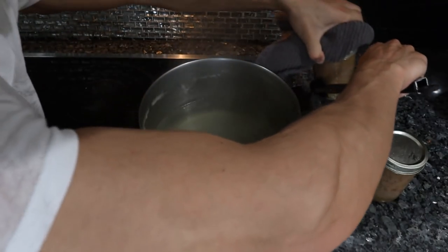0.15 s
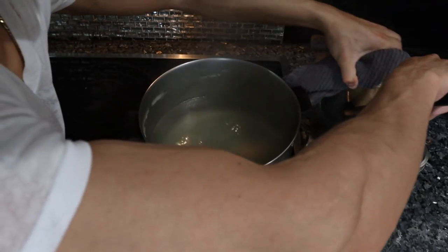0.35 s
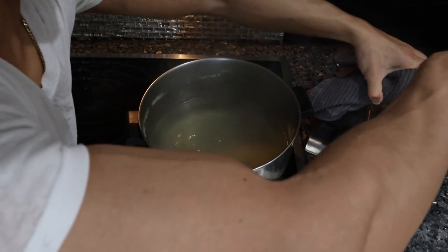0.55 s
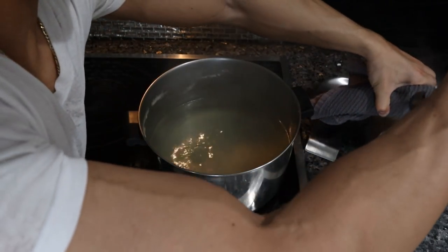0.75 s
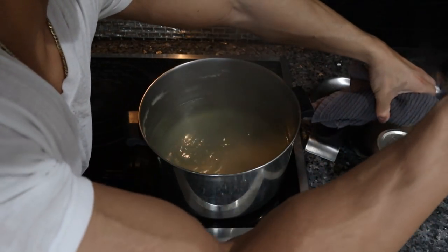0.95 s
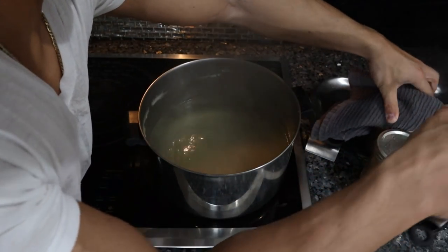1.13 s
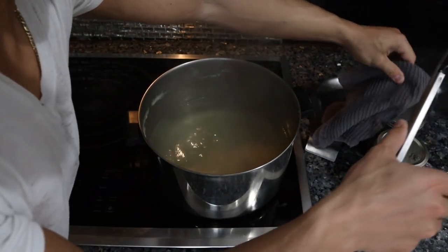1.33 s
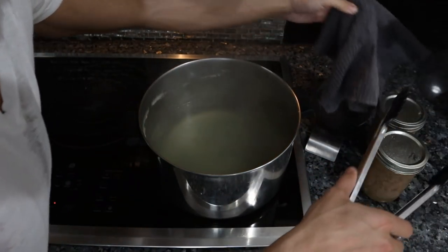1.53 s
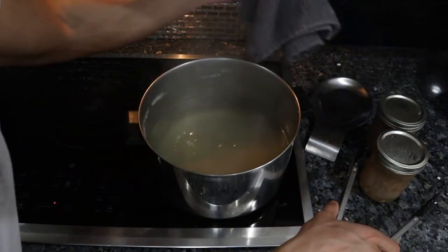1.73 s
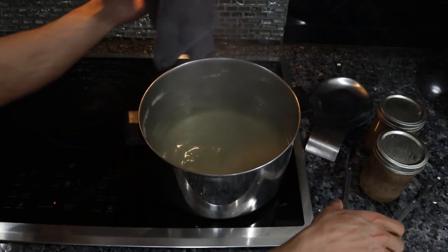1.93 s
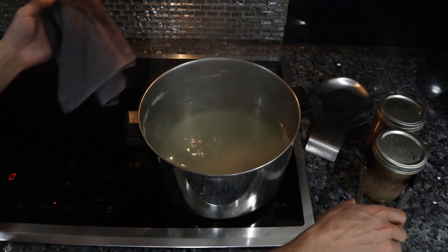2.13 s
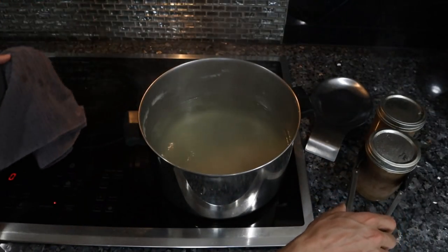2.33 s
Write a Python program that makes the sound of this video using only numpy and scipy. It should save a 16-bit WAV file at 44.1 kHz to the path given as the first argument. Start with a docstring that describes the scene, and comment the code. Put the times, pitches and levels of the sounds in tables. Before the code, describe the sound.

A full glass jar is set on a stone counter, heard close in mono in a small, reflective kitchen. A pot simmers faintly; thin metallic ticks come at 0 and 0.13 s. The jar grazes a spoon rest at 0.65, lands loudly at 1.0 and rocks flat at 1.18. Towel hiss and flapping follow until about 2.2, with faint squeaks near 1.6. Tongs clatter around 2.15-2.2, then scrape softly to a low bump.

```python
"""A small hard kitchen, heard in mono from near a stone counter, over a quietly simmering pot (coloured noise).
A full, hot glass jar comes down in jar tongs: it grazes a spoon rest, lands on its heel and rocks flat.
A towel is drawn away as fluttering hiss and flap; the tongs' hinge ticks and squeaks, and they drag and clatter down.
Each blow is a filtered click with a noise clatter and damped sines; a diffuse tail answers it from the room.
"""
import sys
import numpy as np
from scipy import signal
from scipy.fft import rfft, irfft, next_fast_len
from scipy.io import wavfile
from scipy.ndimage import uniform_filter1d

SR = 44100
rng = np.random.default_rng(int(sys.argv[2]) if len(sys.argv) > 2 else 0)


def wav_record(signal):
    """Record a signal, one row per channel, as 16-bit PCM in the file named by sys.argv[1]."""
    frames = np.transpose(np.atleast_2d(signal))
    bounded = np.clip(frames, -1, 1)
    # unit amplitude maps onto the largest positive 16-bit level
    quanta = np.round(bounded * 32767).astype(np.int16)
    wavfile.write(sys.argv[1], SR, quanta)


N = 104693  # length [samples]

# Simmering pot, colour: (frequency [Hz], level [dB])
SIMMER_COLOUR = [(50, -10.5), (80, -8), (120, 0.5), (165, -6.5), (270, 1.5), (420, -7.5), (580, -6),
                 (950, -13), (1900, -14.5), (2600, -14.5), (4000, -19), (5600, -22), (6900, -22.5),
                 (7900, -34), (10000, -35), (15500, -38.5)]
SIMMER_DB = -56

# Wire hinge of the tongs ticking under load: (time [s], level [dB], ring [dB])
TICKS = [(.0095, -24.5, 6.5), (.1275, -25, 8.5)]
# Colour of a tick: (frequency [Hz], level [dB])
TICK_COLOUR = [(500, -40), (4000, -18), (6400, -0.5), (8000, -11), (10000, -26), (12000, -11), (15500, -20)]
# Ringing of the hinge: (frequency [Hz], energy [dB], t60 [s])
TICK_MODES = [(5220, -10, 0.21), (6470, 11, 0.035), (6670, -6, 0.38), (6640, -19, 0.27), (11650, -18, 0.32),
              (11790, -18, .25), (15200, -14, .08)]

# Faint squeaks of the hinge: (time [s], length [s], frequency [Hz], level [dB])
SQUEAKS = [(.5, .14, 6950, -70), (.8, 0.1, 4530, -61), (1.595, 0.2, 2150, -60), (1.6, 0.2, 4300, -61),
           (1.753, .2, 2510, -63)]
SQUEAK_WIDTH_HZ = 110

# Jar grazing the spoon rest: (time [s], level [dB], ring [dB])
GRAZES = [(.6527, -3, -13.5), (.6692, -6.5, 0.5)]
# Colour of the graze: (frequency [Hz], level [dB])
GRAZE_COLOUR = [(100, -10), (400, -9.5), (600, 2), (1100, 0.5), (1400, -4.5), (2300, 2), (2800, -10.5),
                (3300, -8), (4300, -22), (5500, -15), (7000, -25.5), (15000, -42)]
# Ringing of the graze: (frequency [Hz], energy [dB], t60 [s])
GRAZE_MODES = [(1680, 1, .04), (2000, -6, .03), (2253, -2, .03), (3230, -10.5, 0.023), (5370, -7, .01),
               (5600, -7, .01)]

# Towel sliding off the jar: (time [s], hiss [dB], flapping [dB])
TOWEL_MOVES = [(.7, -90, -89), (0.799, -64, -54.5), (.92, -71, -66), (1.0, -54.5, -46), (1.14, -76, -84),
               (1.27, -57.5, -47.5), (1.47, -54.5, -50), (1.6, -61, -50), (1.68, -57.5, -46.5),
               (1.8, -69, -58.5), (1.93, -74.5, -74.5), (2.06, -69, -56.5), (2.2, -67, -71.5)]
# Colour of the hiss: (frequency [Hz], level [dB])
TOWEL_HISS = [(500, -4), (2000, -1.5), (4400, -1.5), (8000, -6), (10500, -12.5), (12700, -11),
              (15500, -21.5)]
# Colour of the flapping: (frequency [Hz], level [dB])
TOWEL_FLAP = [(60, -28.5), (190, -7), (280, 4.5), (360, -5.5), (480, -7.5), (900, -36), (3000, -62.5)]

# Jar on the stone: (time [s], level [dB], ring [dB], clatter t60 [s], clatter [dB], thud [dB],
# contact [0 heel, 1 flat])
LANDINGS = [(1.0053, 17.5, -3, 0.041, 4, -20, 0), (1.1794, 2.5, -10, 0.0067, 6, -16.5, 1),
            (1.1809, 14.5, 1, 0.04, 3, -17.5, 1), (1.1853, 9.5, -18.5, 0.025, 0, -25, 1)]
# Modes of the jar on the counter: (frequency [Hz], t60 [s], on its heel [dB], flat [dB])
JAR_MODES = [(328.5, 0.1213, 0, -10.5), (410, 0.099, -1.5, -16.5), (462, 0.19, -1.5, -16.5),
             (678.3, 0.11, -2.5, -6.5), (774, 0.1, -0.5, -1), (953.5, 0.16, -3.5, -3.5),
             (983, 0.16, -6, -3.5), (1122, 0.1, -6, -5.5), (1208, 0.048, 3, -5), (1410, 0.076, -4.5, 2.5),
             (1506, 0.1, 5, 3.5), (1570, .11, 2, -9), (1671, 0.101, -5.5, -24), (2013, 0.15, -2.5, -1.5),
             (2200, 0.15, 0, -6), (2397, 0.064, -7, -7), (2765, 0.08, -10.5, -1), (3160, .09, -26.5, -13),
             (3395, 0.061, -16, -21.5), (3580, 0.058, -23, -1.5), (3820, 0.073, -27.5, -10),
             (4180, .07, -33.5, -18.5), (4970, 0.068, -25.5, -23), (6260, 0.11, -41, -28.5),
             (6530, 0.13, -46.5, -28.5), (8020, 0.12, -51.5, -34)]
# Colour of the jar's contact: (frequency [Hz], on its heel [dB], flat [dB])
JAR_COLOUR = [(60.5, -24, -35.5), (230, -12, -15.5), (370.4, -0.5, -11.5), (697, 1.5, -1), (1200, -1.5, 2),
              (1620, -8.5, -6.5), (2350, -3.5, -8), (3410, -20, -14), (4540, -26.5, -25.5),
              (7500, -46.5, -35.5), (15480, -48.5, -44.5)]
# Low thud of the counter: (frequency [Hz], energy [dB], t60 [s])
COUNTER_MODES = [(65, -4, 0.23), (86, 1.5, 0.12), (153, 1, 0.11)]
# Soft bumps of hand and tongs on the counter: (time [s], level [dB])
BUMPS = [(1.292, -14), (1.54, -23), (1.76, -25), (2.03, -26), (2.147, -24), (2.343, -15.5)]

# Tongs dragged a little over the stone: (time [s], level [dB])
DRAG_MOVES = [(2.1, -62), (2.2, -36), (2.29, -48), (2.34, -46), (2.37, -47.5)]
# Colour of the drag: (frequency [Hz], level [dB])
DRAG_COLOUR = [(100, -8), (300, -4.5), (450, 10.5), (700, -2), (1000, 13), (1700, 1.5), (3000, -2.5),
               (4500, 2.5), (8000, -32), (15000, -39)]
# Tongs laid on the counter: (time [s], level [dB], ring [dB], brightness [frequency ratio])
CLACKS = [(2.1456, 5.5, -15.5, 1.076), (2.1670, 0, -19, 1.07), (2.1851, 13, -11.5, 1.038),
          (2.1893, -2, -12, 1.08), (2.1932, 5.5, -21, 1), (2.1972, 8.5, -4, .98)]
# Colour of a clack: (frequency [Hz], level [dB])
CLACK_COLOUR = [(100, -31.5), (600, -26), (1300, -11), (1650, 0), (2150, 0.5), (2600, -6.5), (3200, -23),
                (4000, -20), (5200, -19), (7200, -35.5), (10000, -37.5), (15000, -55)]
# Ringing of the tongs: (frequency [Hz], energy [dB], t60 [s])
CLACK_MODES = [(1541, 4, .08), (1690, -4.5, 0.084), (1910, -17, 0.15), (2020, -1, .05), (2190, -12, 0.037),
               (2300, -28, 0.055), (3100, -21, 0.096), (3690, -11.5, 0.13), (3880, -3, 0.033),
               (4995, -5.5, 0.15), (5730, -12, 0.091)]

# Kitchen reverberation: (frequency [Hz], t60 [s], level [dB])
KITCHEN_BANDS = [(100, .42, -9), (296, .46, -7), (782.5, .41, -10), (2000, 0.53, -8), (4440, 0.37, -9),
                 (8000, 0.45, -8), (15000, .22, -17)]
ROOM_BUILD_S, WALL_S = 0.02, 0.012  # build-up of the echoes, delay of the nearest wall
CLATTER_EVEN_HZ, ROOM_EVEN_HZ = 300, 200  # bandwidths over which noise energy is evened
TOP_HZ = 15700  # upper limit of the microphone channel


def undb(db):
    """Decibels to gain."""
    return 10 ** (np.asarray(db) / 20)


def unit(x):
    """Scale to unit energy."""
    return x / np.sqrt(np.sum(x ** 2))


def fade(t60):
    """Exponential decay by 60 dB in t60 seconds (1 ms at least)."""
    return np.exp(-np.log(1000) * np.arange(N) / SR / max(t60, 1e-3))


def at(x, s):
    """Start a sound at a given time."""
    gap = np.zeros(x.shape[:-1] + (max(int(s * SR), 0),))
    return np.concatenate([gap, x], axis=-1)[..., :N]


def gesture(s, db):
    """Gain along (time, level) points, silent before the first."""
    t = np.arange(N) / SR
    return undb(np.interp(t, s, db)) * (t >= s[0])


def colour(x, points):
    """Minimum-phase filter through (Hz, dB) points, rolling off below the first at 12 dB per octave."""
    hz, db = np.array(points).T
    size = next_fast_len(N + SR // 4)
    f = np.maximum(np.fft.rfftfreq(size, 1 / SR), 1)
    log_gain = np.log(undb(np.interp(np.log(f), np.log(hz), db)))
    log_rolloff = np.log(1 + np.square(hz[0] / f) ** 2) / 2
    # Folding the cepstrum onto positive time makes the filter causal.
    cepstrum = irfft(log_gain - log_rolloff, size)
    cepstrum[1:size // 2] *= 2
    cepstrum[size // 2 + 1:] = 0
    return irfft(rfft(x, size) * np.exp(rfft(cepstrum)), size)[:N]


def even(env, width_hz, count=2):
    """Noise under an envelope, with its energy spread evenly over bands of a given width."""
    x, size = rng.standard_normal(N) * env, next_fast_len(N)
    for _ in range(count):
        spec = rfft(x, size)
        band_power = uniform_filter1d(abs(spec) ** 2, int(width_hz * size / SR))
        x = irfft(spec / np.sqrt(band_power + 1e-12), size)[:N]
        x[N // 2:] = 0  # drop what wraps round to the end
    return unit(x)


def noise(points, flutter_db, rate):
    """Coloured noise of unit rms; its level wanders through random steps, rate per second, smoothed."""
    step = int(SR / rate)
    steps = np.repeat(rng.standard_normal(N // step + 1), step)
    walk = uniform_filter1d(steps, step)[:N]
    fluttering = colour(rng.standard_normal(N), points) * undb(flutter_db * walk)
    return unit(fluttering) * np.sqrt(N)


def ring(modes):
    """Damped sines of alternating sign from (Hz, energy dB, t60 s) rows, at unit energy together."""
    t, tone = np.arange(N) / SR, 0
    for k, (hz, db, t60) in enumerate(modes):
        mode = unit(fade(t60) * np.sin(2 * np.pi * hz * t))
        tone = tone + (-1) ** k * undb(db) * mode
    return unit(tone)


def contact(points, t60, clatter_db):
    """A sharp contact as a pair: near, with the clatter of surfaces around it, and as sent to the room."""
    push = signal.unit_impulse(N)
    clatter = even(fade(t60) * (1 - fade(0.0051)), CLATTER_EVEN_HZ)
    near = unit(colour(push + undb(clatter_db) * clatter, points))
    sent = unit(colour(push, points))
    return np.array([near, sent])


def blows(rows, points, modes, t60, clatter_db):
    """Contacts that ring one object; each may have a brightness ratio, and a higher one shifts its colour up."""
    tone, out = ring(modes), 0
    for s, db, ring_db, *bright in rows:
        ratio = bright[0] if bright else 1
        knock = contact(np.array(points) * [ratio, 1], t60, clatter_db)
        out = out + at(undb(db) * (knock + undb(ring_db) * tone), s)
    return out


def simmer():
    """The pot simmers as a steady coloured noise whose level flutters slightly."""
    return noise(SIMMER_COLOUR, flutter_db=0.87, rate=36) * undb(SIMMER_DB)


def hinge_ticks():
    """The loaded wire hinge gives small contacts that ring high and thin."""
    return blows(TICKS, TICK_COLOUR, TICK_MODES, t60=0.017, clatter_db=18)


def squeaks():
    """The hinge rubs in one narrow, breathy band, swelling and dying away."""
    t, out = np.arange(N) / SR, 0
    for s, length, hz, db in SQUEAKS:
        b, a = signal.iirpeak(hz, hz / SQUEAK_WIDTH_HZ, fs=SR)
        rub = signal.lfilter(b, a, rng.standard_normal(N))
        swell = np.sin(np.pi * np.clip((t - s) / length, 0, 1))
        out = out + undb(db) * rub / rub.std() * swell
    return out


def graze():
    """The jar touches the spoon rest in brief contacts with a short ring."""
    return blows(GRAZES, GRAZE_COLOUR, GRAZE_MODES, t60=0.052, clatter_db=4)


def towel():
    """Cloth hisses over the lid and flaps as it is lifted: two fluttering noises."""
    s, hiss_db, flap_db = np.array(TOWEL_MOVES).T
    hiss = gesture(s, hiss_db) * noise(TOWEL_HISS, flutter_db=1.5, rate=60)
    flap = gesture(s, flap_db) * noise(TOWEL_FLAP, flutter_db=3.1, rate=57)
    return hiss + flap


def jar():
    """The jar lands on its heel, then rocks flat, its modes reweighted; the counter thuds under it."""
    out = 0
    for s, db, ring_db, t60, clatter_db, thud_db, flat in LANDINGS:
        side = int(flat)
        points = [(row[0], row[1 + side]) for row in JAR_COLOUR]
        modes = [(row[0], row[2 + side], row[1]) for row in JAR_MODES]
        knock = contact(points, t60, clatter_db)
        glass = undb(ring_db) * ring(modes)
        thud = undb(thud_db) * ring(COUNTER_MODES)
        out = out + at(undb(db) * (knock + glass + thud), s)
    return out


def bumps():
    """Soft pushes wake only the counter's low modes, with a rounded onset."""
    thud = unit(ring(COUNTER_MODES) * (1 - fade(0.014)))
    return sum(at(undb(db) * thud, s) for s, db in BUMPS)


def drag():
    """The tongs scrape softly over the stone as the hand lets them rest: fluttering noise."""
    return gesture(*np.array(DRAG_MOVES).T) * noise(DRAG_COLOUR, flutter_db=0.5, rate=210)


def tongs():
    """The tongs clatter down in a run of contacts that ring their metal."""
    return blows(CLACKS, CLACK_COLOUR, CLACK_MODES, t60=0.014, clatter_db=2.5)


def kitchen(x):
    """Diffuse echoes that build up after the nearest wall, each frequency band with its own decay."""
    hz, t60, db = np.array(KITCHEN_BANDS).T
    size = 2 ** 17
    log_f = np.log(np.maximum(np.fft.rfftfreq(size, 1 / SR), 1))
    mean_t60 = t60.mean()
    spec = rfft(even(fade(mean_t60) * (1 - fade(ROOM_BUILD_S)), ROOM_EVEN_HZ), size)
    t, tail = np.minimum(np.arange(N) / SR, 1), 0
    for k in range(len(hz)):
        share = np.interp(log_f, np.log(hz), np.eye(len(hz))[k])  # overlapping bands that sum to one
        band = irfft(spec * share)[:N]
        # Turn the mean decay into the band's own.
        tail = tail + undb(db[k]) * band * np.exp(np.log(1000) * t * (1 / mean_t60 - 1 / t60[k]))
    response = at(tail, WALL_S)[:SR]
    return signal.fftconvolve(x, response)[:N]


def scene():
    """The blows near the microphone and in the room, with the softer sources added dry."""
    hinge, spoon_rest, metal = hinge_ticks(), graze(), tongs()
    glass = jar() + bumps()
    near = (hinge + spoon_rest + glass + metal)[0]
    sent = undb(-3.5) * hinge + undb(1.0) * spoon_rest + undb(0.35) * glass + undb(-5.5) * metal
    room = kitchen(sent[1])
    return (near + room + simmer() + squeaks() + towel() + drag())[None]


def record(dry):
    """The microphone channel clips at full scale, then a steep low-pass cuts the top."""
    low_pass = signal.ellip(8, 0.2, 70, TOP_HZ, fs=SR, output="sos")
    return signal.sosfilt(low_pass, np.clip(dry, -1, 1))


dry = scene()
out = record(dry)
wav_record(out)
```